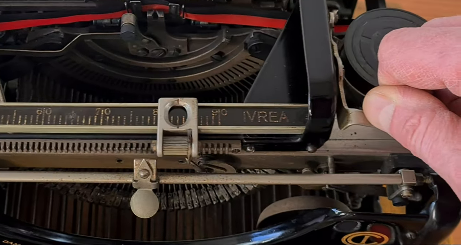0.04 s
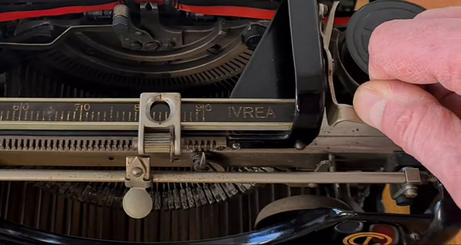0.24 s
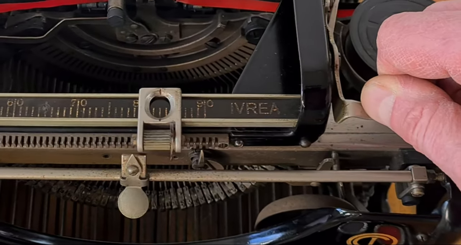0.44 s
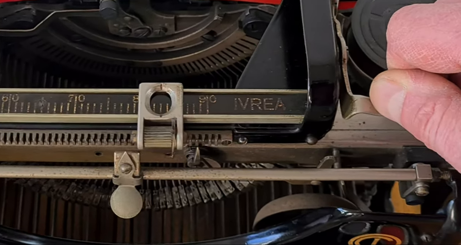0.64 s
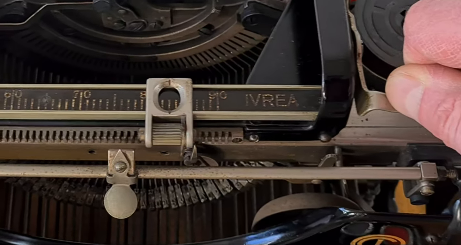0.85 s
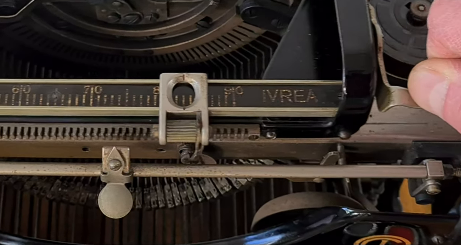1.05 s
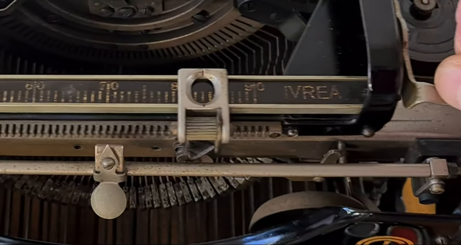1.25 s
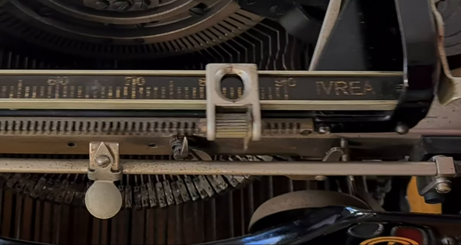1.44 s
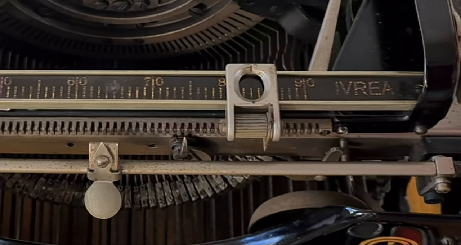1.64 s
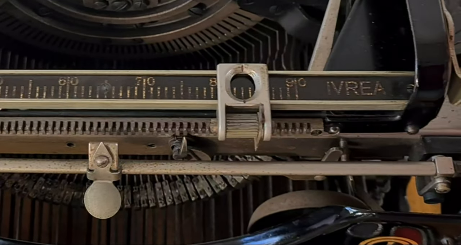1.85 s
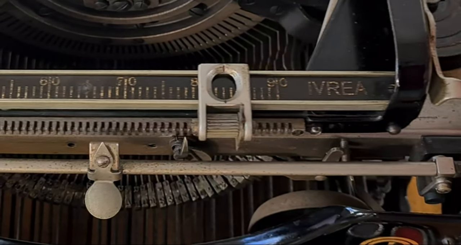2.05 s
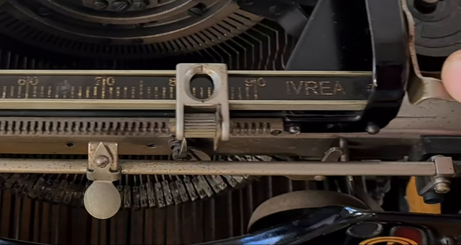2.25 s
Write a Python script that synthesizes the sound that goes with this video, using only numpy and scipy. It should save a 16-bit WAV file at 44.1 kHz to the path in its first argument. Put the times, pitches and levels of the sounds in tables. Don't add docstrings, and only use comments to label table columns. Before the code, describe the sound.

Single bright bell strike on an old typewriter, its thin ring wavering and slowly fading, followed by a faint catch touch and a sharp metallic click, heard close in stereo in a small room.

```python
import sys
import numpy as np
from scipy import signal
from scipy.fft import rfft, irfft
from scipy.io import wavfile

SR = 44100
rng = np.random.default_rng(int(sys.argv[2]) if len(sys.argv) > 2 else 0)


def makeup_ratio(level_db):
    decades = np.asarray(level_db, float) / 20
    return 10 ** decades


def wav_record(signal):
    frames = np.transpose(np.atleast_2d(signal))
    bounded = np.clip(frames, -1, 1)
    quanta = np.round(bounded * 32767).astype(np.int16)
    wavfile.write(sys.argv[1], SR, quanta)


N = 101430
STRIKE_S = 0.2285


def at_hz(points, hz):
    table_hz, value = np.transpose(points)
    return np.interp(np.log(hz), np.log(table_hz), value)


def rms_one(x):
    return x / np.sqrt(np.mean(x ** 2) + 1e-20)


def butter4(x, hz, kind):
    return signal.sosfilt(signal.butter(4, hz, kind, fs=SR, output="sos"), x)


def bands(noises, low_hz, high_hz, count):
    edges = np.geomspace(low_hz, high_hz, count + 1)
    for k, (low, high) in enumerate(zip(edges, edges[1:])):
        band_pass = signal.butter(2, [low, high], "band", fs=SR, output="sos")
        yield np.sqrt(low * high), signal.sosfilt(band_pass, noises[k % 2])


def ring(clicks, hz, t60):
    r, w = makeup_ratio(-60 / (t60 * SR)), 2 * np.pi * hz / SR
    return signal.lfilter([0, np.sin(w)], [1, -2 * r * np.cos(w), r * r], clicks + 1e-18)


def colour(x, table):
    gain = makeup_ratio(at_hz(table, np.fft.rfftfreq(x.shape[-1], 1 / SR) + 1))
    return irfft(rfft(x) * gain, x.shape[-1])


# pitch_hz, level_db
HISS_DROP = [(300, -4), (1000, -3.5), (4000, -3), (7500, -26), (12000, -6.5)]
# pitch_hz, share
LIKENESS = [(40, .99), (90, .98), (150, .85), (290, .66), (640, .15), (3000, .02)]


def background(spectrum, low_hz, high_hz, count, drop):
    lowered = drop * np.clip((np.arange(N) / SR - STRIKE_S) / 0.061, 0, 1)
    out, unlowered = 0, 0
    for hz, both in bands(rng.standard_normal((2, 2, N + SR)), low_hz, high_hz, count):
        mid, side = both[:, SR:] * makeup_ratio(at_hz(spectrum, hz))
        alike = np.clip(at_hz(LIKENESS, hz), 0, 1)
        common = np.sqrt(1 + alike) * mid
        apart = np.sqrt(1 - alike) * side * [[1], [-1]]
        unlowered = unlowered + common
        out = out + makeup_ratio(at_hz(HISS_DROP, hz) * lowered) * (common + apart)
    return out / np.sqrt(np.mean(unlowered ** 2))


# pitch_hz, level_db
RUMBLE = [(21, -33), (35, -1), (54, 3.5), (75, 0.5), (95, -6.5), (145, -25.5), (200, -22), (300, -42.5),
          (390, -65), (660, -120)]
# time_s, level_db
TRAFFIC = [(0.0, -55), (0.44, -62.5), (0.73, -57), (0.79, -65.5), (0.979, -54.5), (1.16, -61.5),
           (1.18, -56.5), (2.27, -60), (2.3, -58)]
RUMBLE_DB, RUMBLE_LOW_HZ = -0.54, 38


def rumble():
    noise = butter4(background(RUMBLE, 44.44, 300, count=10, drop=0), RUMBLE_LOW_HZ, "high")
    swell = makeup_ratio(RUMBLE_DB + np.interp(np.arange(N) / SR, *np.transpose(TRAFFIC)))
    return swell * noise * makeup_ratio([[-.5], [.5]])


# pitch_hz, level_db
HISS = [(150, -29), (250, -8.5), (354, -7.5), (519, -10), (1580, -18), (1820, -26.5), (13200, -30),
        (16000, -29.5)]
HISS_DB, HISS_TOP_HZ = -80, 15800


def hiss():
    low_pass = signal.cheby2(10, 40, HISS_TOP_HZ, fs=SR, output="sos")
    return makeup_ratio(HISS_DB) * signal.sosfilt(low_pass, background(HISS, 250, 15000, count=14, drop=1.0))


BELL_HZ = [2445.45, 2500.1, 5801.9, 5807.55, 9568.1, 9583.85, 13826.1, 13832.8]
BELL_T60_S = [2.58, 5.84, 2.6, 2.594, 1.05, 0.89, .335, .29]
# level_db, lobe_angle_rad, extra_db while the hammer rocks the bell,
# then extra_db and turn_rad once the carriage or hand has moved
LEFT = [(-35, 0.06, -7, -2.5, 1.8), (-53.5, 2.5, 3, 0, 1.1), (-40, 1.07, 3, 6.5, 2.2),
        (-39, 3.5, 0.2, 11, 0.55), (-35, 2, 1.6, 9, 1.9), (-21.5, 3, -1.2, 7, 1.3),
        (-31, 0.9, -1.3, 2.5, .11), (-28, 1.63, 0.8, -0.6, .11)]
# level_db, lobe_angle_rad, rock_db, slid_db, turn_rad
RIGHT = [(-49.5, 3.5, 11, -0.7, 0.51), (-57, -2.5, 6, -0.2, 1.2), (-51.5, -1.9, 3.5, 9.5, 0.23),
         (-38.5, 3.5, 6, 13.5, 1.3), (-28.5, 1.54, -1.5, 5.5, 0.15), (-28, 4, -6.5, 3, 0.18),
         (-18.5, 0.4, -1.4, -0.1, .11), (-27, -0.1, -11, 0, .11)]
# time_s, share of the way
CARRIAGE = [
    (.6, 0),
    (1.0, 0.13),
    (1.4, 0.76),
    (1.9, 0.98),
    (2.3, 0.95),
]
# time_s, share of the way
HAND = [
    (0.599, 0.06),
    (0.799, 0.17),
    (1.0, 0.61),
    (1.2, 1.13),
]
SETTLE_S, BELL_RISE_S = 0.23, 0.002
EARLIER_RING_DB = -88.5


def bell():
    t = np.arange(N) / SR
    age = np.maximum(t - STRIKE_S, 0)
    rock = np.exp(-age / SETTLE_S)
    moves = [np.interp(t, *np.transpose(way)) for way in (CARRIAGE, HAND) for _ in range(4)]
    out = np.zeros((2, N))
    for ear, table in enumerate((LEFT, RIGHT)):
        for hz, t60, slid, row in zip(BELL_HZ, BELL_T60_S, moves, table):
            db, angle, rock_db, slid_db, turn = row
            level = makeup_ratio(db - 60 * age / t60 + rock_db * rock + slid_db * slid)
            out[ear] += level * np.cos(2 * np.pi * hz * age + angle + turn * slid)
    former = makeup_ratio(EARLIER_RING_DB - 60 * t / BELL_T60_S[1]) * np.sin(2 * np.pi * BELL_HZ[1] * t)
    return out * (1 - np.exp(-age / BELL_RISE_S)) + former * (age == 0)


def top_cut(x):
    return signal.sosfilt(signal.ellip(8, 1, 28, 15950, fs=SR, output="sos"), x)


LEAD_DB, LEAD_S = -26, 0.0062
MODE_SCATTER = 0.0089
PARTNER_DB = -4


def contacts(rows, modes, crack_colour):
    t, crack = np.arange(N) / SR, np.zeros(N)
    grit = rng.standard_normal((2, N))
    for s, db, crack_s, crack_db in rows:
        shape = makeup_ratio(db) * (t >= s) * np.exp(-np.maximum(t - s, 0) / crack_s)
        lead = makeup_ratio(db + LEAD_DB) * (t < s) * np.exp(np.minimum(t - s, 0) / LEAD_S)
        crack = crack + (shape + lead) * makeup_ratio(crack_db)
    out = crack * rms_one(colour(grit + 0.27 * grit[0], crack_colour))
    s, blow_db = np.transpose(rows)[:2]
    for hz, db, t60, pan_db in modes:
        for detune in (-1, 1):
            blows = np.zeros(N)
            blows[(s * SR).astype(int)] = makeup_ratio(blow_db) * rng.choice([-1, 1], len(s))
            pan = np.array([[.5], [-.5]]) * (pan_db + rng.normal(0, 2.5))
            side = makeup_ratio(db - 4.0 + PARTNER_DB * (detune > 0) + pan)
            mode_hz = hz * (1 + MODE_SCATTER * detune * rng.uniform(0.45, 1))
            out += side * ring(blows, mode_hz, t60)
    return top_cut(out)


# start_s, level_db, crack_length_s, crack_db
HAMMER = [
    (.2278, -40.5, 0.00093, 9),
    (.2292, -29, 0.0013, 4.5),
    (.2312, -30, 0.0034, 2),
    (.2378, -38.5, 0.007, 5.5),
    (.244, -44.5, .004, 6),
]
# pitch_hz,
# level_db, t60_s, left_right_db
FRAME = [(770, -12.5, 0.026, -4.5), (910.3, -0.5, 0.049, -0.8), (889, -26, 0.099, -1), (1488, -1, 0.05, 5),
         (1527, -6, .05, 1.5), (1498, -26.5, 0.4, -2), (2925, -5.5, 0.034, 3.2), (3380, -7.5, .03, 5.5),
         (3520, -7, 0.062, -0.4), (4800, -4, .04, 0), (4930, -30.5, .6, -3.1), (5930, -16, 0.021, -0.2),
         (6910, -18, .04, -6), (8480, -7.5, .015, -5), (10900, -14.5, .02, -4), (11930, -9.5, 0.04, -7),
         (12200, -23.5, 0.2, -2.5), (13300, -10.5, .02, -3), (15000, -8.5, 0.018, -4), (15660, 3.5, .07, 5)]
# pitch_hz, level_db
CRACK = [(300, -33), (700, -9.5), (1500, -9), (4500, -5.5), (9000, -10.5), (13700, -5.5), (16500, -21.5)]


def hammer():
    return contacts(HAMMER, FRAME, CRACK)


# start_s, level_db, crack_length_s, crack_db
SHAKE = [
    (.233, -41, .004, -40.5),
    (.2385, -47.5, .004, -40),
    (.244, -43.5, .004, -39),
]
# pitch_hz, level_db, t60_s, left_right_db
CASE = [(194, -11, .1, -0.5), (366, -12, .2, -2), (499, 0, .09, 0.1), (600, -16, 0.048, -0.7)]


def case():
    return contacts(SHAKE, CASE, CRACK)


# pitch_hz, t60_s
ROOM_T60 = [(200, 0.8), (1000, 0.48), (4000, 0.49), (9000, 0.24), (15800, 0.09)]
# pitch_hz, level_db
ROOM_DB = [(200, -11), (1500, -13.5), (3000, -11), (4800, -13.5), (7500, -11), (12000, -6), (15700, -8)]


def room(x):
    t = np.arange(int(.7 * SR)) / SR
    noises = rng.standard_normal((2, 2, len(t)))
    tail = 0
    for hz, band in bands(noises, 100, 18000, count=15):
        tail = tail + band * makeup_ratio(at_hz(ROOM_DB, hz) - 60 * t / at_hz(ROOM_T60, hz))
    tail = top_cut(tail * np.minimum(t / 0.002, 1) / np.sqrt(SR / 50))
    return signal.fftconvolve(x, tail, axes=1)[:, :N]


# start_s, level_db, crack_length_s, crack_db
TOUCH = [
    (1.021, -66, 0.002, 1.2),
    (1.0255, -68.5, 0.0048, 1.1),
]
# pitch_hz, level_db, t60_s, left_right_db
CATCH = [(1460, -2, 0.088, 4), (1740, 3.5, 0.03, -1.5), (3400, 0, 0.015, 6.5), (4270, 3.5, 0.012, 8),
         (6530, -9, .012, 0), (7630, -11, 0.015, 7), (11900, -17, 0.02, 3), (15100, -16, 0.019, -7)]
# pitch_hz, level_db
SNAP = [(300, -47), (600, -43.5), (1500, -10.5), (5000, -15), (9000, -11.5), (14000, -5.5), (16500, -19.5)]


def catch():
    return contacts(TOUCH, CATCH, SNAP)


# start_s, level_db, length_s
TICKS = [
    (1.185, -75, .003),
    (2.137, -77, .004),
    (2.296, -80, .004),
    (1.58, -80, .004),
]
TICK_HZ = 8500


def ticks():
    t = np.arange(N) / SR
    shape = sum(makeup_ratio(db) * (t >= s) * np.exp(-np.maximum(t - s, 0) / length) for s, db, length in TICKS)
    return shape * butter4(rng.standard_normal((2, N)), TICK_HZ, "high")


# start_s, level_db, crack_length_s, crack_db
LATCH = [
    (1.3154, -35.5, 0.00061, 4),
    (1.3163, -42, 0.00054, 3),
    (1.3172, -37.5, 0.00086, 3),
    (1.3196, -48.5, 0.0011, 3),
    (1.3211, -46.5, 0.0041, 3),
    (1.3242, -47, .004, 3),
]
# pitch_hz, level_db, t60_s, left_right_db
LEVER = [(565, -15, 0.046, -1), (758, -19.5, 0.073, 1), (1146, -11, 0.044, 2), (1408, 0.5, 0.025, 2),
         (1520, -10, 0.052, 6.8), (1440, -26.5, 0.3, -1.5), (1630, -14.5, 0.031, -1),
         (2410, -18.5, 0.047, -5.5), (3487, -8.5, 0.015, 13), (4060, -6, 0.022, -0.5), (4560, -6, 0.041, 1),
         (4540, -25.5, 0.12, -3), (6045, -7, 0.039, 2.5), (7470, -24, 0.024, -2.5), (8900, -6, .02, 9),
         (10430, -0.5, 0.013, -6), (10970, -1.5, 0.016, 1.5), (11470, -7, 0.017, -2), (12030, 1.5, .015, 4),
         (13200, 0, 0.016, -1), (13800, -7, 0.025, 7), (14600, 7, 0.035, -4.5), (15520, 1.5, 0.04, 7)]


def lever():
    return contacts(LATCH, LEVER, SNAP)


SMALL_PARTS_HZ = 484.4
RIGHT_LAG = 7


def scene():
    floor = rumble() + hiss()
    small_parts = hammer() + catch() + ticks() + lever()
    knocks = butter4(small_parts, SMALL_PARTS_HZ, "high") + case()
    knocks[1] = np.roll(knocks[1], RIGHT_LAG)
    return bell() + knocks + room(knocks) + floor


def band_limit(x):
    return signal.sosfilt(signal.butter(12, 16980, fs=SR, output="sos"), x)


def record(dry):
    mix = signal.sosfilt(signal.cheby2(10, 50, 18200, fs=SR, output="sos"), dry)
    return band_limit(mix)


dry = scene()
out = record(dry)
wav_record(out)
```